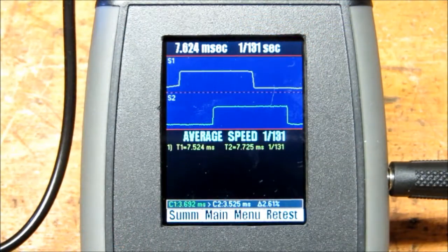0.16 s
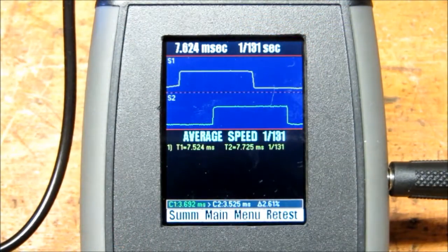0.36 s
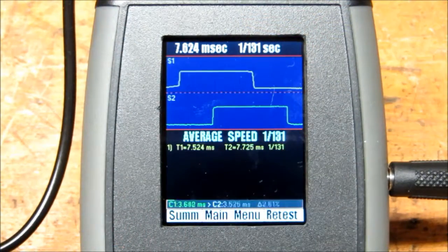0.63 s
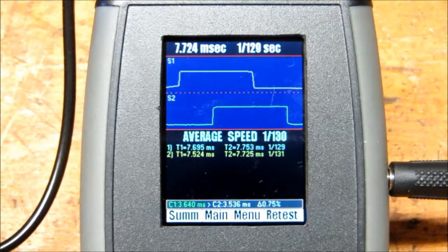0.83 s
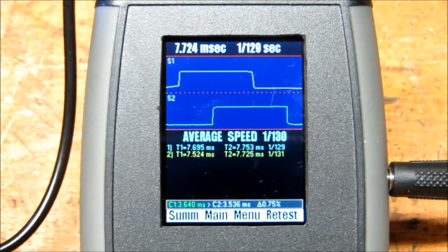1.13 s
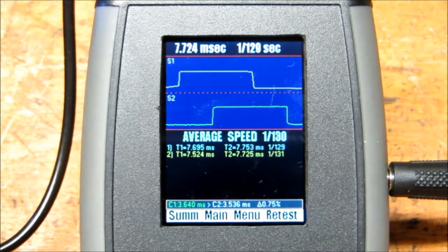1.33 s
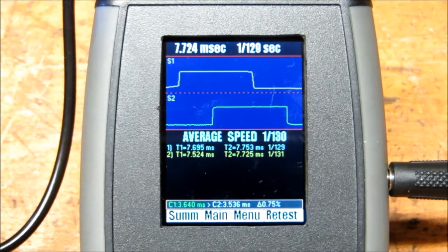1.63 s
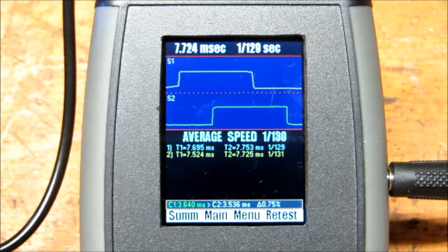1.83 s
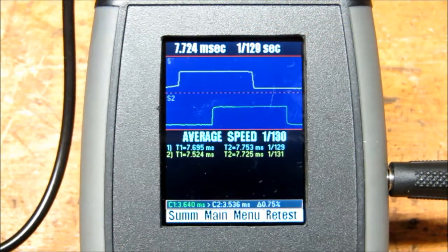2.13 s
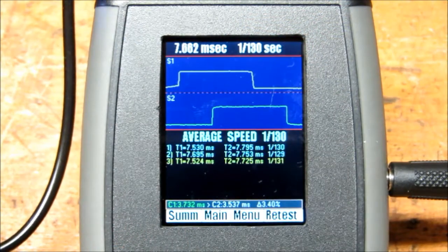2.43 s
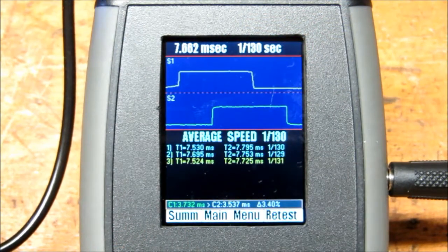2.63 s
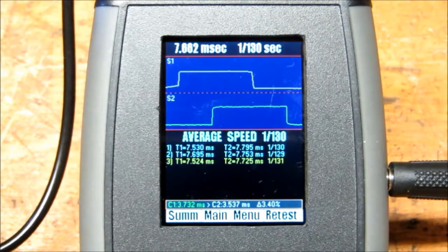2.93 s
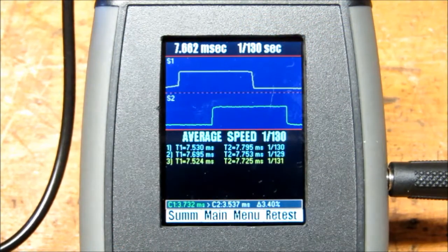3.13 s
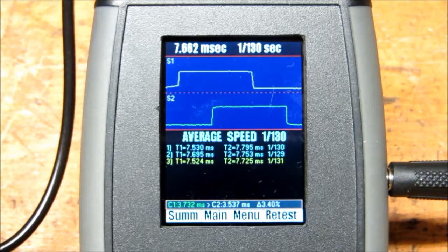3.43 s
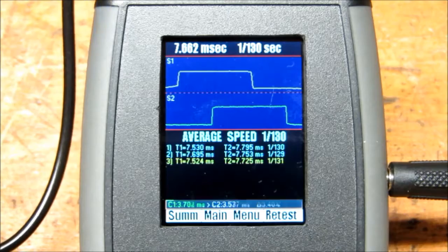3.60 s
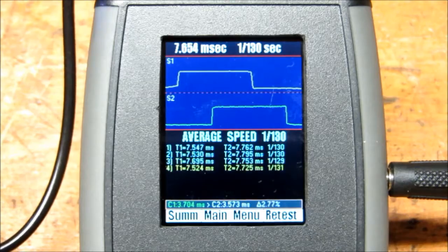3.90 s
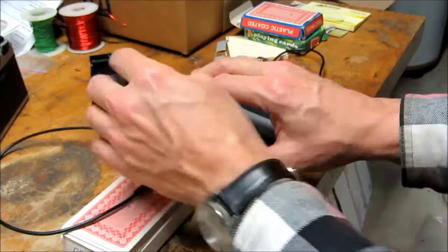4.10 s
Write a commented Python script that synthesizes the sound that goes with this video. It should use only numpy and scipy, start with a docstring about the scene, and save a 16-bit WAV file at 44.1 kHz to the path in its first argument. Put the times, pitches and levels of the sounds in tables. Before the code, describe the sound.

A quiet room with steady soft hiss and two barely audible high whistles; a tiny tick at 0.15 s. At 0.36 s a film camera fires close by: a crisp metal clack, a faint slide, then a tight cluster of bright knocks and clatter over about 0.16 s, thin and ringing, with a faint low bench thud. At 0.84 s the winding lever knocks, then a pawl clicks rapidly over gear teeth from 0.9 to 1.2 s, getting stronger, ending in stop knocks; at 1.41-1.5 s the lever whirs and snaps back. The second firing is at 1.88 s, winding from 2.37 to 2.73 s, spring-back around 2.87-2.95 s. Small ticks precede the third firing at 3.33 s. Winding begins at 3.89 s, clicking until about 4.06 s, when sound briefly dips and the camera goes silent. Hiss returns with grainy hand rustling and dull bench thuds, strongest near 4.2 s.

```python
"""A quiet room hisses with two thin whistles; small ticks sound on a film camera lying on a bench.
At 0.36, 1.88 and 3.33 s it fires: a chain of metal blows rings the shell and thuds the bench.
After each a hand winds it on: lever blows, then a pawl clicking over gear teeth while the film drags;
twice the lever springs back. At 4.06 s camera and hiss dip briefly; the camera stays silent.
Then hands rustle, as uneven grains of noise, with a few more thuds on the bench."""
import sys
import numpy as np
from scipy import signal
from scipy.fft import rfft, irfft
from scipy.io import wavfile
from scipy.ndimage import uniform_filter1d

SR = 44100
rng = np.random.default_rng(int(sys.argv[2]) if len(sys.argv) > 2 else 0)


def wav_record(signal):
    """Record a signal, one row per channel, as 16-bit PCM in the file named by sys.argv[1]."""
    frames = np.transpose(np.atleast_2d(signal))
    bounded = np.clip(frames, -1, 1)
    # unit amplitude maps onto the largest positive 16-bit level
    quanta = np.round(bounded * 32767).astype(np.int16)
    wavfile.write(sys.argv[1], SR, quanta)


def nominal_scale(level):
    """Amplitude ratio for a level in decibels (scalar or array-like)."""
    x = np.asarray(level, float) / 20
    return 10 ** x


N = 187753
T = np.arange(N) / SR
HZ = np.fft.rfftfreq(N, 1 / SR)


def evened(x):
    """Scales to rms 1."""
    return x / np.sqrt(np.mean(x ** 2) + 1e-20)


def read(points, hz):
    """Reads a spectrum on a log-frequency axis."""
    f, value = np.transpose(points)
    return np.interp(np.log(hz + 1), np.log(f + 1), value)


def noise_pair(colour, likeness, left_over_right_db=((1, 0), (2, 0))):
    """Left and right spectra of coloured noise, alike by the given share."""
    a, b = rfft(rng.standard_normal((2, N)))
    share = np.clip(read(likeness, HZ), -1, 1)
    lean = nominal_scale(read(left_over_right_db, HZ) / 2)
    left = a * lean
    right = (share * a + np.sqrt(1 - share ** 2) * b) / lean
    return nominal_scale(read(colour, HZ)) * np.array([left, right])


# hiss spectrum: (f/Hz, relative density/dB per Hz)
HISS_COLOUR = [(15, -37), (25, -6.5), (53, -9.5), (212, -3), (263, -4), (326, -1), (451, -6), (796, -4),
               (911, -0.5), (1190, -5), (7310, -21.5), (8140, -17.5), (11300, -28.5), (16000, -32)]
# channel likeness of the hiss, negative = opposite phase: (f/Hz, likeness)
HISS_LIKENESS = [(60, -0.7255), (150, -0.93), (380, -0.9372), (950, -0.88325), (2380, -0.86), (5980, -0.67),
                 (15000, -1.4)]
# faint hiss alike in both channels: (f/Hz, relative density/dB per Hz)
COMMON_HISS_COLOUR = [(500, -4), (8500, 0.5), (12000, -4.5), (16000, -10)]
# electrical whine: (f/Hz, rms level/dB)
WHISTLES = [(7866.7, -71.5), (15735.5, -75)]


def background():
    """Steady hiss, mostly opposite in the two channels, a faint common hiss and the whistles."""
    hiss_db, common_db = -51, -69
    hiss = nominal_scale(hiss_db) * evened(irfft(noise_pair(HISS_COLOUR, HISS_LIKENESS), N))
    white = rfft(rng.standard_normal(N))
    common = nominal_scale(common_db) * evened(irfft(white * nominal_scale(read(COMMON_HISS_COLOUR, HZ)), N))
    whistles = np.zeros(N)
    for hz, db in WHISTLES:
        whistles += nominal_scale(db) * np.sqrt(2) * np.sin(2 * np.pi * (hz * T + rng.random()))
    return hiss + common + whistles


def four_bands(pair, split_hz):
    """Four overlapping bands of a noise pair, each with a mid channel of rms 1."""
    lowpasses = [1 / (1 + (HZ / edge) ** 12) for edge in split_hz]
    band_power = np.diff([0 * HZ, *lowpasses, 0 * HZ + 1], axis=0).clip(0)
    bands = irfft(np.sqrt(band_power)[:, None] * pair, N)
    return bands / np.sqrt(np.mean(bands.mean(1) ** 2, 1))[:, None, None]


def blow_power(blows, rise_s, crack_t60_s, tail_db):
    """Power in four bands: each blow is a short crack over a rattling tail."""
    power, t = np.zeros((4, N)), np.arange(SR // 5) / SR
    for s, db, bass_db, low_db, treble_db, t60_s in blows:
        crack = nominal_scale(-120 * t / crack_t60_s)
        tail = nominal_scale(2 * tail_db - 120 * t / t60_s)
        shape = (crack + tail) * np.minimum(t / rise_s, 1) ** 4
        band_power = nominal_scale(2 * (db + np.array([bass_db, low_db, 0, treble_db])))
        at = round((s - rise_s / 2) * SR)
        power[:, at:at + len(t)] += np.outer(band_power, shape)[:, :N - at]
    return power


def slide_power(stretches, tone, edge_s=0.0011):
    """Power in four bands along each stretch of sliding."""
    power = np.zeros((4, N))
    bass, low, treble = tone
    for stretch in stretches:
        s, db = np.transpose(stretch)
        gate = np.clip(np.minimum(T - s[0], s[-1] - T) / edge_s + .5, 0, 1)
        level_db = np.interp(T, s, db)
        band_db = [level_db + offset_db + slope * (level_db + 40)
                   for offset_db, slope in (bass, low, (0, 0), treble)]
        power += gate * nominal_scale(2 * np.array(band_db))
    return power


# stereo lean of the near sources: (f/Hz, left over right/dB)
NEAR_LEAN = [(60, 4), (180, 2), (550, 4), (1650, 3), (4970, 2), (15000, .7)]
# channel likeness of the near sources: (f/Hz, likeness)
NEAR_LIKENESS = [(60, 0.24), (180, -0.1), (550, 0.95), (1650, 0.92), (4970, 0.9), (15000, 0.4)]


def rattle(power, colour, split_hz, grit_db):
    """A swarm of tiny uneven contacts under the envelope."""
    steps = np.repeat(rng.standard_normal(N // 12 + 1).clip(-2, 2), 12)[:N]  # one draw per 12 samples
    grit = evened(nominal_scale(grit_db * steps))
    bands = four_bands(noise_pair(colour, NEAR_LIKENESS, NEAR_LEAN), split_hz)
    return grit * (np.sqrt(power)[:, None] * bands).sum(0)


def ring(blows, modes, split_hz, ring_db, rise_s, spots_hz=()):
    """Each blow sets the modes ringing, weighted by where it lands, in its own phases."""
    spot_gain_db, spot_octaves = 9.5, 0.1  # modes near the spot's pitch ring most
    scatter_db = 4.5  # no two blows excite the modes alike
    detune_share = 0.0076  # each blow's modes are randomly detuned a little
    rise_cycles = 1.6  # low modes need a few cycles to build up
    hz, mode_db, t60_s = np.transpose(modes)[:, :, None]
    out, t = np.zeros((2, N)), np.arange(SR // 6) / SR
    lean = nominal_scale(np.multiply.outer([.5, -.5], read(NEAR_LEAN, hz)))
    lag = np.arccos(np.clip(read(NEAR_LIKENESS, hz), -1, 1))
    rise = np.minimum(t / np.maximum(rise_s, rise_cycles / hz), 1)
    spots_db = [spot_gain_db * np.exp(-(np.log2(hz / spot) / spot_octaves) ** 2) for spot in spots_hz]
    spots_db += [0] * len(blows)
    chances = rng.random((len(blows), 4, len(hz), 1))
    for (s, db, bass_db, low_db, treble_db, _), spot_db, chance in zip(blows, spots_db, chances):
        band_db = np.array([bass_db, low_db, 0, treble_db])[np.digitize(hz, split_hz)] + spot_db
        detuned_hz = hz * (1 + detune_share * (2 * chance[3] - 1))
        phase = 2 * np.pi * (detuned_hz * t + chance[0])
        phase = phase + np.multiply.outer([0, 1], lag * np.sign(chance[1] - .3))
        start_db = ring_db + db + band_db + mode_db + scatter_db * (2 * chance[2] - 1)
        size = nominal_scale(start_db - 60 * t / t60_s) * rise
        at = round(s * SR)
        out[:, at:at + len(t)] += (lean * size * np.sin(phase)).sum(1)[:, :N - at]
    return out


def toned(rows, tone):
    """Completes blow rows with bass, treble and tail from the rule of their kind."""
    bass_db, bass_slope, treble_db, treble_slope, t60_s = tone
    return [(s, db, bass_db + bass_slope * (db + 30), low_db, treble_db + treble_slope * low_db, t60_s)
            for s, db, low_db in rows]


# releases: (t/s, strength/dB)
RELEASES = [(.3592, 0.177), (1.8762, 0.14), (3.3284, -0.0578)]


def each_release(rows):
    """Repeats a pattern after every release, shifted by its strength."""
    return [(s + at, db + strength_db, *rest) for at, strength_db in RELEASES for s, db, *rest in rows]


# blows: release, bounce, mirror stop, first curtain, second curtain, brake, bounce, rebound, mirror fall
# (t after release/s, level/dB, against it bass/dB, low middle/dB, treble/dB, tail t60/s)
CHAIN = [(.0001, -14, -7.5, -7.5, -8, .06), (.004, -19.5, -9.5, -5.5, -1.5, 0.037),
         (.0726, -20.5, -6, -9.5, -8.5, 0.14), (.0977, -12, -5.5, -3.5, -16, .026),
         (.1118, -13.5, -19, -16, -6.5, .011), (.12, -12.5, -17.5, -10.5, -8, .04),
         (.1243, -13, -18, -6.5, -3.5, .026), (.1376, -27, -14, -8, 2, .03),
         (.1554, -20, -10.5, -7.5, -17, .028)]
# pitch near which each blow of the chain excites the shell most: f/Hz
CHAIN_SPOTS_HZ = [1060, 1080, 1500, 7185, 7185, 2122, 2100, 3814, 3828.9]
# small ticks on the body, perhaps fingers shifting: (t/s, level/dB, low middle against it/dB)
TICKS = [(0.1511, -37.5, -13), (0.67, -49, -10), (3.116, -50.5, -6), (3.1296, -44, -7.5), (3.675, -42, 0),
         (3.7544, -48.5, 1.5)]
# tick colour: (bass/dB at -30 dB level, its slope/dB per dB of level,
# treble/dB, its slope/dB per dB of low middle, tail t60/s)
TICK_TONE = (-25, -0.1, -10, .1, 0.0009)
# sliding: mirror swing, pause, curtain travel, mirror clatter, its dying rattle: (t after release/s, level/dB)
RUNNING = [
    [(.006, -26), (.014, -34.5), (.03, -33), (.072, -39.5)],
    [(.075, -33), (.097, -37.5)],
    [(.101, -28), (.111, -34.5), (.119, -34.5)],
    [(.126, -24), (.14, -24.5), (.15, -28.5), (.162, -33.5), (.175, -42.5)],
    [(.175, -41), (.2, -50), (.24, -57.5), (.28, -67)],
]
# per stretch, bass, low middle, treble: (against level/dB at -40 dB, slope/dB per dB of level)
RUNNING_TONE = [
    [(-12.5, -0.33), (-17, 0.05), (-1.5, -0.06)],
    [(-6.5, .05), (-9.5, 0.4), (-4, -0.41)],
    [(-10.5, -0.0761), (-9, 0.57), (-1, -0.4)],
    [(-3.5, -1.03), (-3, -0.78), (-10, 0.3766)],
    [(-4.5, 0.9), (-3, .35), (-10.5, 0.1)],
]
# rattle of the shell: (f/Hz, relative density/dB per Hz)
BODY_COLOUR = [(120, -67), (200, -45.5), (519, -23.5), (800, -6.5), (1060, 2), (1740, -0.5), (2130, 3),
               (2960, -10.5), (3690, -3), (7140, -11.5), (14300, -14), (16000, -37)]
# ringing of the shell: (f/Hz, relative level/dB, t60/s)
BODY_MODES = [(660, -19, .04), (867, -8.5, 0.064), (1055, -2, 0.06), (1123, -7.5, 0.17),
              (1523.7, -7.5, 0.047), (1932, -0.5, 0.047), (2133, 4, 0.02), (2174, -1.5, 0.014),
              (2420, -15.5, 0.019), (2796, -8.5, 0.043), (3100, -0.5, 0.017), (3494, -0.5, 0.027),
              (3769.5, -9, 0.03), (4570, -4, .03), (5269, 2, 0.01), (5700, -1.5, 0.021), (6500, 6.5, 0.015),
              (7114.9, 6, 0.012), (8400, -13.5, 0.0058), (9163, -9.5, 0.029), (10910, 5.5, 0.021),
              (12200, -6.5, .012)]
# edges between the four bands: f/Hz
BODY_SPLIT_HZ = (1400, 2800, 8000)


def shutter():
    """Mirror, curtains and brake strike the metal shell; small ticks excite it too."""
    blows = each_release(CHAIN) + toned(TICKS, TICK_TONE)
    power = blow_power(blows, rise_s=0.00072, crack_t60_s=0.019, tail_db=-11.5)
    for pattern, tone in zip(RUNNING, RUNNING_TONE):
        stretches = np.reshape(each_release(pattern), (len(RELEASES), -1, 2))
        power += slide_power(stretches, tone)
    ringing = ring(blows, BODY_MODES, BODY_SPLIT_HZ, ring_db=-11.0, rise_s=0.0016,
                   spots_hz=CHAIN_SPOTS_HZ * len(RELEASES))
    return rattle(power, BODY_COLOUR, BODY_SPLIT_HZ, grit_db=3.5) + ringing


# walls soak up treble: (f/Hz, relative level/dB)
ROOM_COLOUR = [(500, 8.5), (1200, -1.5), (3000, 0.5), (7000, -5.5), (14000, -7)]
# decay: (f/Hz, t60/s)
ROOM_T60 = [(300, .3), (1000, 0.41), (2500, 0.45), (6000, 0.41), (14000, 0.15)]


def room(x):
    """Sparse reflections of random sign, each band dying at its own speed."""
    taps = np.zeros((2, SR))
    at = np.arange(200, SR - 20, 20) + rng.integers(0, 20, (2, (SR - 201) // 20))
    np.put_along_axis(taps, at, rng.choice([-1., 1.], at.shape), 1)
    taps[1] = 0.28 * taps[0] + .8 * taps[1]
    hz, t, z = signal.stft(taps, SR, nperseg=256)
    decay_db = read(ROOM_COLOUR, hz)[:, None] - 60 * t / read(ROOM_T60, hz)[:, None]
    tail = signal.istft(z * nominal_scale(decay_db), SR, nperseg=256)[1]
    tail = tail / np.linalg.norm(tail[0])
    wet = signal.fftconvolve(x.mean(0)[None], tail, axes=1)[:, :N]
    return wet * nominal_scale(np.array([[1.5], [-1.5]]))


# the bench answers each release: (t after release/s, relative level/dB, f/Hz, t60/s)
CHAIN_THUDS = [(.073, -54.5, 96.3, .36), (.111, -54, 94, .17)]
# the bench bumped: (t/s, relative level/dB, f/Hz, t60/s)
THUDS = [(1.263, -56, 95, 0.1448), (2.377, -51.5, 332, 0.08), (1.463, -58.5, 152, 0.11),
         (2.74, -58.5, 97.34, 0.1289), (2.911, -55, 99, 0.06095), (3.89, -56.5, 326, 0.1175),
         (4.1, -66, 97, 0.1734), (4.111, -60, 420, 0.23), (4.201, -48.5, 339.2, 0.08415),
         (4.227, -60, 413, 0.1103)]
# loose shake: (f/Hz, relative density/dB per Hz)
SHAKE_COLOUR = [(40, -20.5), (70, -5), (110, 0), (200, -9), (350, -0.5), (550, -1), (800, -28)]


def bench():
    """Low thuds through the bench top, a ring and a loose shake, stronger in the left microphone port."""
    rise_s = .008
    tone, level = np.zeros((2, N))
    for s, db, hz, t60_s in THUDS + each_release(CHAIN_THUDS):
        t = np.maximum(T - s, 0)
        size = nominal_scale(db - 60 * t / t60_s) * (1 - np.exp(-t / rise_s))
        tone += 2 * size * np.sin(2 * np.pi * hz * t)
        level += size
    shake = evened(irfft(noise_pair(SHAKE_COLOUR, [(100, 0.39), (600, 0.9778)], NEAR_LEAN), N))
    ringing = np.array([2.0 * tone, 0.1 * np.roll(tone, 60)])  # right: weaker, 60 samples late
    return ringing + nominal_scale(3.5) * level * shake


# lever blows: (t/s, level/dB, low middle against it/dB)
TAKE_UP = [(.8373, -15.5, -9), (.8552, -23.5, -14), (.8641, -36.5, -1.5), (2.366, -15.5, -6),
           (2.3904, -32.5, -6.5), (2.4007, -36.5, -11.5), (3.89, -16.5, -14), (3.9108, -30.5, -14),
           (3.9159, -38, -9), (3.9224, -37, -10)]
END_STOP = [(1.2051, -20.5, -15.5), (1.2145, -17, -4.5), (1.2368, -35, -9.5), (1.2481, -33, -6.5),
            (1.2588, -31.5, -7.5), (2.6843, -28, 2.5), (2.6932, -19.5, -4), (2.7066, -39, .1),
            (2.716, -31, -11), (2.7239, -33.5, -9.5), (2.728, -29.5, -9.5)]
SPRING_BACK = [(1.41, -23, -7.5), (1.4127, -26, -4.5), (1.4371, -19, -11), (1.4439, -24, -9),
               (1.4536, -22, -9), (1.4612, -8.5, -14), (1.4716, -12.5, -0.5), (1.4783, -24.5, -8),
               (2.863, -42, -8), (2.8766, -20.5, -10.5), (2.8937, -23, -7), (2.9108, -8, -13.5),
               (2.919, -11.5, 0), (2.9273, -18, -8.5)]
# their colours: (bass/dB at -30 dB level, its slope/dB per dB of level,
# treble/dB, its slope/dB per dB of low middle, tail t60/s)
TAKE_UP_TONE = (-10, -0.213, -4, 0.1292, .029)
END_STOP_TONE = (-20.5, 0.1727, -7.5, 0.0875, 0.0559)
SPRING_TONE = (-9.5, -0.21, -2, 1.7, 0.0211)
# whir of the lever springing back: (t/s, level/dB)
RETURNING = [
    [(1.395, -60), (1.408, -39.5), (1.418, -39), (1.436, -49), (1.44, -30), (1.46, -26), (1.482, -29.5),
     (1.5, -45), (1.53, -61.5)],
    [(2.866, -62), (2.875, -39), (2.89, -34.5), (2.895, -29.5), (2.908, -26), (2.92, -30), (2.932, -35),
     (2.95, -49), (2.99, -65)],
]
# bass, low middle, treble of the whir: (against level/dB at -40 dB, slope/dB per dB of level)
RETURNING_TONE = [(-8.5, -0.6), (-4.5, -0.19), (-8, 0.4)]
# rattle of the lever: (f/Hz, relative density/dB per Hz)
LEVER_COLOUR = [(150, -59), (250, -21), (501, -32), (1120, -5), (1550, -11), (2160, -0.5), (2810, -8),
                (3580, -1.5), (10400, -4.5), (11900, -1), (16000, -21.5)]


def lever():
    """The lever knocks on the shell and whirs back on its spring."""
    blows = toned(TAKE_UP, TAKE_UP_TONE) + toned(END_STOP, END_STOP_TONE) + toned(SPRING_BACK, SPRING_TONE)
    power = blow_power(blows, rise_s=0.00083, crack_t60_s=0.012, tail_db=-9.5)
    power += slide_power(RETURNING, RETURNING_TONE)
    ringing = ring(blows, BODY_MODES, BODY_SPLIT_HZ, ring_db=-9.0, rise_s=0.00099)
    return rattle(power, LEVER_COLOUR, BODY_SPLIT_HZ, grit_db=3.5) + ringing


# pawl dropping over the gear teeth; every third or so a cog knocks with it
# (t/s, level/dB, low middle against it/dB)
RATCHET = [(.9047, -40.5, -5.5), (.9136, -30.5, -12), (.9297, -31, -12.5), (.9488, -32.5, -7),
           (.9646, -32.5, -4), (.9819, -33, -7.5), (.9989, -32.5, -10.5), (1.01, -30, -4), (1.0184, -27, 3),
           (1.0378, -29, -9), (1.0557, -31, -10), (1.0617, -25.5, 0), (1.0729, -31, -15),
           (1.0871, -32, -12), (1.1002, -24, -4.5), (1.1121, -34, -5), (1.1227, -29.5, -1),
           (1.1282, -24.5, -2.5), (1.1409, -28, -5), (1.1529, -25, -.6), (1.1627, -29, -5),
           (1.1731, -35, -3.5), (1.1797, -22.5, -4), (1.1932, -33, -9.5), (2.4377, -33, -3),
           (2.4525, -33.5, -7), (2.4565, -35, -0.3314), (2.4633, -29.5, -6.5), (2.4771, -36, -2.8252),
           (2.4913, -33.5, -6.5), (2.5029, -27.5, -1.5), (2.5222, -33, -9), (2.5435, -29.5, -8.5),
           (2.5508, -31.5, 7.5), (2.5619, -32, -8.5), (2.577, -30, -7), (2.5885, -27.5, 1),
           (2.5988, -31.5, -5.5), (2.6091, -32.5, -4), (2.6144, -24, -5.5), (2.6272, -33, -1.5),
           (2.6408, -23, -4), (2.6507, -39, -3), (2.658, -37.5, -3.5), (2.664, -26.5, -6.5),
           (2.6741, -23.5, -6), (3.9439, -32, -6), (3.9714, -31.5, -9), (3.986, -36, -3.5),
           (4.0013, -30, -11), (4.0141, -32, -9.5), (4.0233, -29, 1.5), (4.0411, -31, -10.5)]
# pawl colour: (bass/dB at -30 dB level, its slope/dB per dB of level,
# treble/dB, its slope/dB per dB of low middle, tail t60/s)
PAWL_TONE = (-13.5, -0.6, 1.2, 0.6, 0.046)
# film drag along each stroke: (t/s, level/dB)
WINDING = [
    [(.845, -53), (.9, -61.5), (1.0, -56.5), (1.2, -46), (1.25, -41.5), (1.275, -57.5), (1.3, -67),
     (1.4, -70)],
    [(2.372, -41.5), (2.41, -47), (2.43, -67), (2.5, -47.5), (2.54, -61), (2.68, -43.5), (2.73, -47.5),
     (2.76, -62), (2.79, -74), (2.865, -70)],
    [(3.897, -44.5), (3.93, -51.5), (3.96, -64), (4.057, -52.5)],
]
# bass, low middle, treble of the drag: (against level/dB at -40 dB, slope/dB per dB of level)
WINDING_TONE = [(-8, -.45), (-6, -0.1), (-5, -0.0027)]
# rattle of the gears: (f/Hz, relative density/dB per Hz)
GEAR_COLOUR = [(240, -55), (400, -25), (607, -33.5), (852, -12.5), (1560, -9), (2320, -10.5), (3530, -3.5),
               (4510, -10.5), (6150, -6.5), (11000, -7), (16000, -11)]
# ringing of the gear train: (f/Hz, relative level/dB, t60/s)
GEAR_MODES = [(1193, -9, 0.029), (1581.3, -8, 0.043), (2074.3, -0.5, 0.023), (2620, -10, 0.043),
              (3558.2, -5.5, 0.03331), (5107.8, -5, 0.026), (6150, 0.2, .027), (6350, -1.5, 0.014),
              (7100, -3, 0.015), (7810, -4, 0.021), (9797, -3.5, 0.012), (10900, -3.5, 0.019),
              (12920, -4, 0.0079)]
# edges between the four bands: f/Hz
GEAR_SPLIT_HZ = (2500, 4500, 8000)


def ratchet():
    """The pawl clicks over the teeth and rings the gears while the film drags."""
    blows = toned(RATCHET, PAWL_TONE)
    power = blow_power(blows, rise_s=0.0018, crack_t60_s=0.013, tail_db=-9)
    power += slide_power(WINDING, WINDING_TONE)
    ringing = ring(blows, GEAR_MODES, GEAR_SPLIT_HZ, ring_db=-3.0, rise_s=0.00095)
    return rattle(power, GEAR_COLOUR, GEAR_SPLIT_HZ, grit_db=2.0) + ringing


# brushing: (t/s, level/dB)
RUSTLE = [(4.089, -47.5), (4.101, -50.5), (4.16, -59), (4.164, -47), (4.185, -49.5), (4.229, -61),
          (4.257, -52.5)]
# bass, low middle, treble: (against level/dB at -40 dB, slope/dB per dB of level)
RUSTLE_TONE = [(-16.5, -0.93), (-14, -.8), (-10.5, -0.352)]
# spectrum: (f/Hz, relative density/dB per Hz)
RUSTLE_COLOUR = [(24, -45.5), (40, -19), (96, -4), (256, -7.5), (329, -5.5), (1020, 0.5), (1180, -6),
                 (2320, 0.5), (9940, -10), (16000, -27)]
# channel likeness: (f/Hz, likeness)
RUSTLE_LIKENESS = [(60, -0.46), (240, -0.01), (950, -0.25), (3770, 0.57), (15000, 0.12)]


def rustle():
    """Hands and sleeves brushing over the bench, in uneven grains."""
    grain_db = 1.8 * evened(uniform_filter1d(rng.standard_normal(N), 120))
    grain = evened(nominal_scale(grain_db))
    bands = four_bands(noise_pair(RUSTLE_COLOUR, RUSTLE_LIKENESS), BODY_SPLIT_HZ)
    power = slide_power([RUSTLE], RUSTLE_TONE, edge_s=.001)
    return grain * (np.sqrt(power)[:, None] * bands).sum(0)


# dip of camera and background: (t/s, gain/dB)
DIP = [(4.056, 0), (4.058, -10), (4.07, -17), (4.087, -14), (4.089, 0)]


def scene():
    """Camera in its room until 4.075 s and background, both dipped; rustle and bench undipped."""
    camera = shutter() + lever() + ratchet()
    highpass = signal.butter(7, 710, "high", fs=SR, output="sos")
    camera = signal.sosfilt(highpass, camera)  # keeps the blows thin, with little below 710 Hz
    camera_in_room = (camera + nominal_scale(-24.5) * room(camera)) * (T < 4.075)
    dip = nominal_scale(np.interp(T, *np.transpose(DIP)))
    return (camera_in_room + background()) * dip + rustle() + bench()


def band_limit(x):
    """A steep low-pass at the top of the band."""
    return signal.sosfilt(signal.butter(12, 16850, fs=SR, output="sos"), x)


def record(dry):
    """Band limit, then an input stage that rounds off the loudest peaks."""
    edge_hz = 15900
    lowpass = signal.firwin(1023, edge_hz, window=("kaiser", 8), fs=SR)
    limited = signal.oaconvolve(dry, lowpass[None], "same")
    rounded = limited / (1 + limited ** 12) ** (1 / 12)
    return band_limit(rounded)


dry = scene()
out = record(dry)
wav_record(out)
```